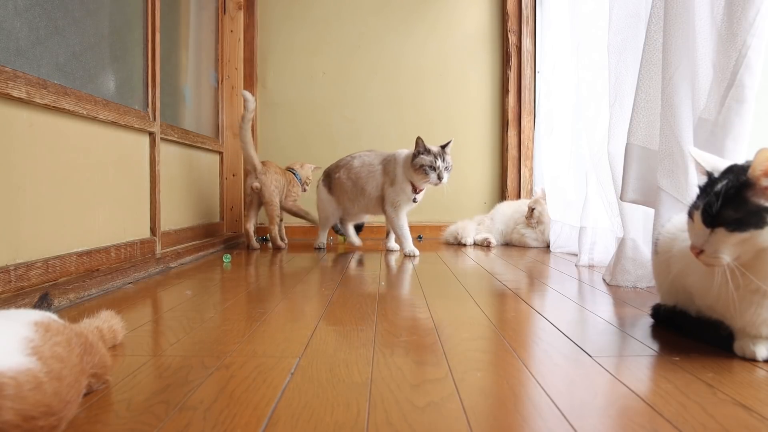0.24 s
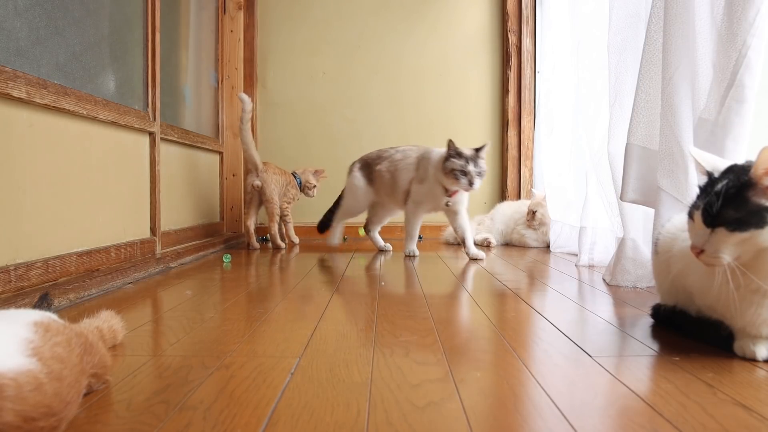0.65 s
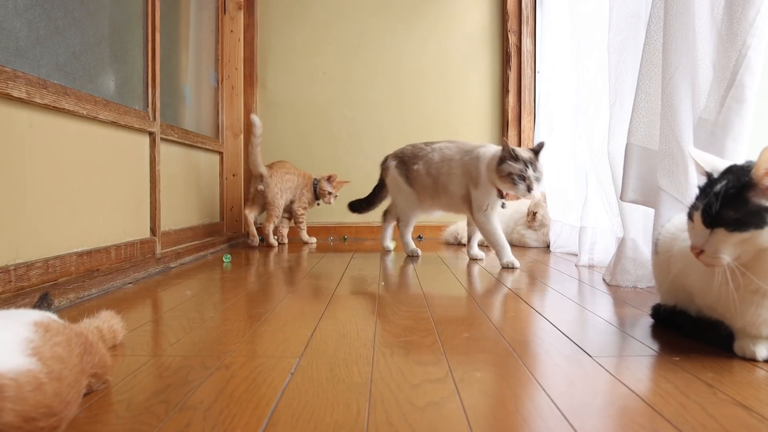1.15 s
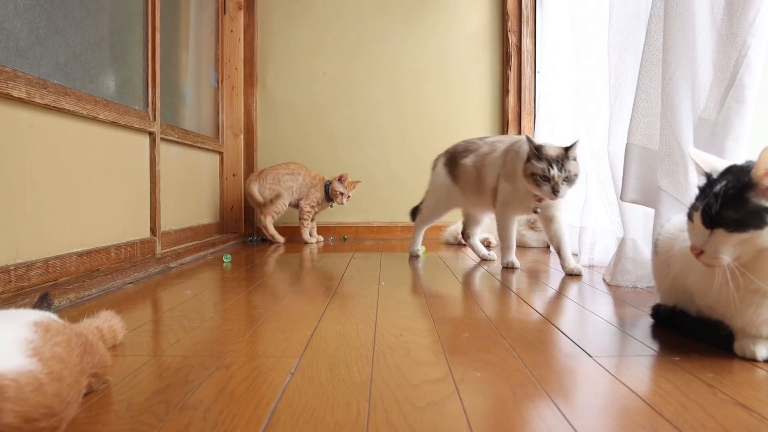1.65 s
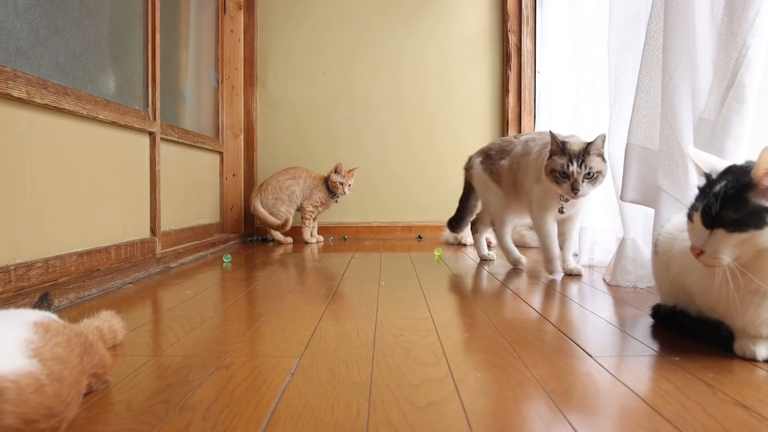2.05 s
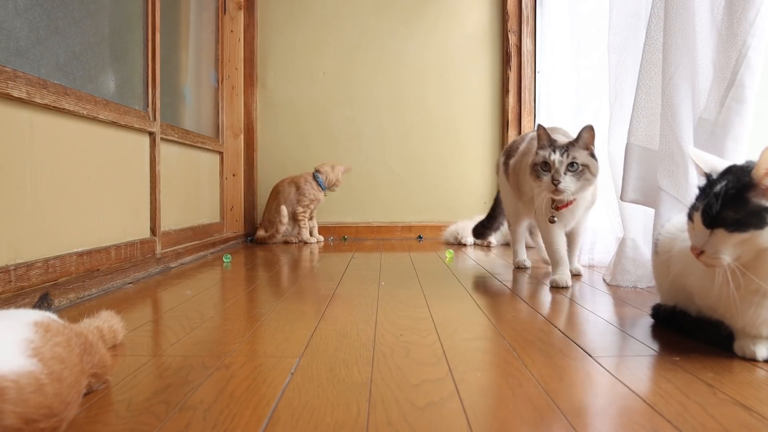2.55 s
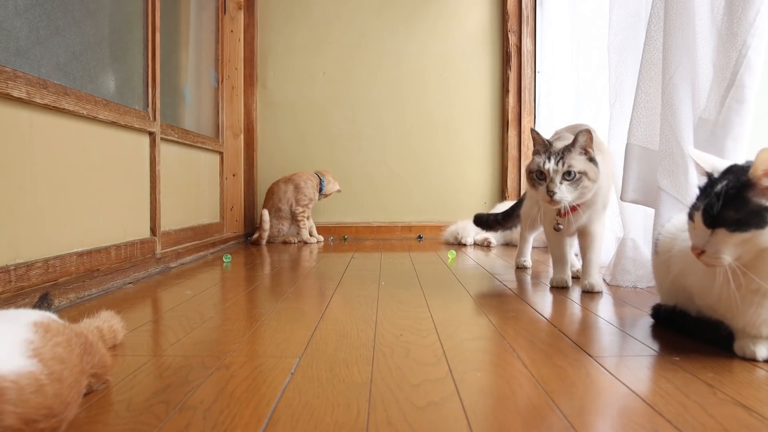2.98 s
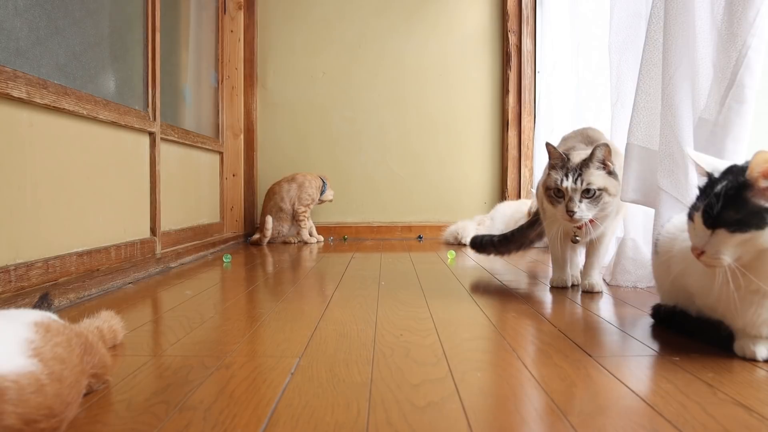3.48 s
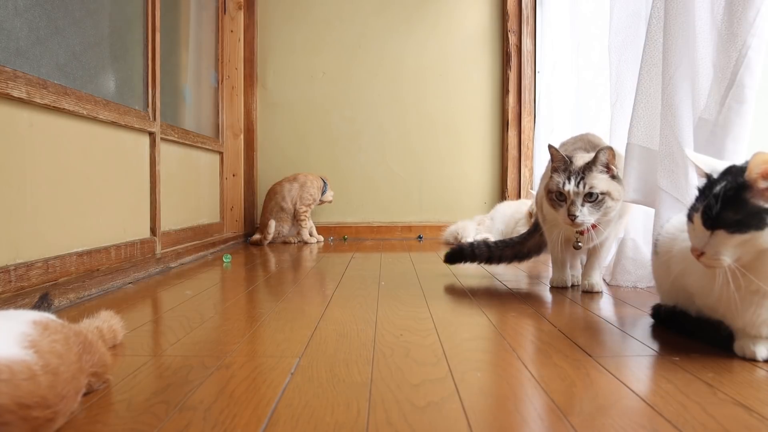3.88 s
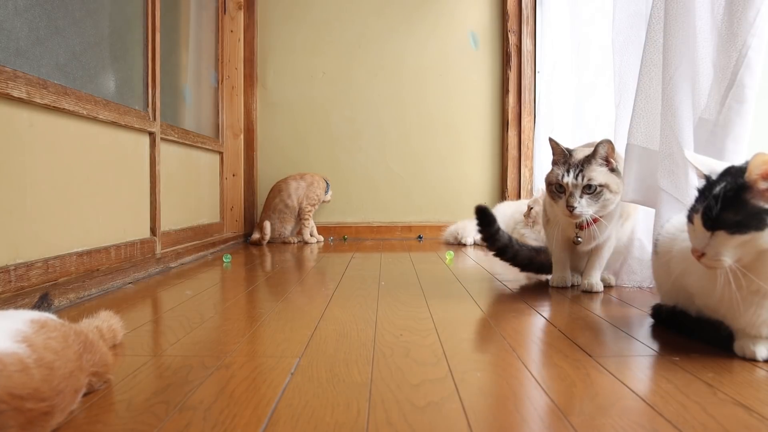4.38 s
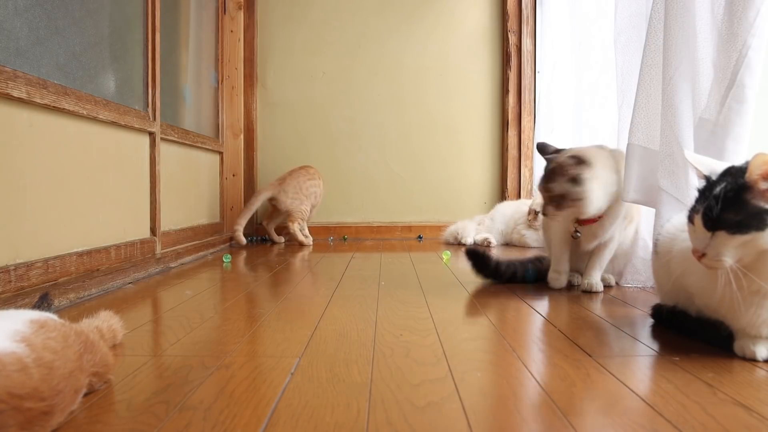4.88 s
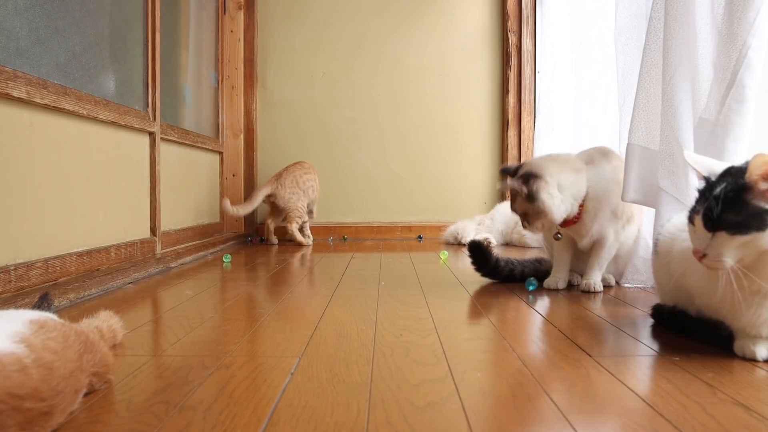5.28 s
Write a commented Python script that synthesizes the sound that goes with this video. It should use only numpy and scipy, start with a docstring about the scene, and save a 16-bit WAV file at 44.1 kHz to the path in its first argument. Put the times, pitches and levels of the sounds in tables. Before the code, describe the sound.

Indoors, close stereo microphones hear rubber balls thudding and slapping on wooden boards over a soft low air rush. Opening knocks lead to a run that quickens and fades. After a near pause, a loud close smack lands, then a hard double hit with panel rattle and deep shudder, and finally another shortening series of bounces on the right-hand part of the floor.

```python
"""A hard thud opens the scene over a steady rush of air; more rubber-ball bounces strike a wooden-floored room.
Each contact pulse excites the damped modes of the boards, most add a dispersed bending wave, and
filtered noise gives the slap; one run of bounces is computed from a fixed loss of speed, so it quickens and fades.
A loose door panel buzzes; faint whistles, tinks and a deep shudder follow at set times.
Echoes and a diffuse ring form the room; a close microphone pair with gain control hears it all."""
import sys
import numpy as np
from scipy import signal
from scipy.fft import rfft, irfft, next_fast_len
from scipy.io import wavfile
from scipy.ndimage import uniform_filter1d

SR = 44100
rng = np.random.default_rng(int(sys.argv[2]) if len(sys.argv) > 2 else 0)


def int16_out(signal):
    """Quantize to a 16-bit WAV file."""
    q = np.round(np.clip(np.atleast_2d(signal).T, -1, 1) * 32767)
    wavfile.write(sys.argv[1], SR, q.astype(np.int16))


N = 243873

# Bounces timed one by one, among them the settling ball's earlier ones.
# Each row: start in seconds, landing spot, blow in dB, contact in ms, slap in dB.
BOUNCES = [ (0.001, "edge", -8, 2.84, -6.5), (0.1045, "wall", -5, 1.74, 3.5),
           (0.3847, "edge", 1.5, 1.95, -2), (0.6238, "far", 0, 1.8, -1.5), (0.8212, "far", -1.5, 2.18, -7),
           (0.989, "far", -2, 2.21, -6), (1.1362, "far", -3, 2.2, -5.5), (1.812, "far", -18, 3.6, -30),
           (1.936, "far", -21, 4.6, -35), (2.8869, "close", 9.5, 1.63, 15.5), (3.9705, "edge", 8, 1.16, 14),
           (4.0455, "frame", 11, 1.44, 8.5), (4.098, "frame", 2, 2.45, -12.5),
           (4.7280, "right", 6.5, 1.66, 0), (4.9475, "wall", -21.5, 1.4, -3),
           (5.0149, "right", -1, 2.08, -6.5), (5.1472, "right", -2.5, 2.12, -7),
           (5.288, "right", -8.5, 2.45, -27), (5.3657, "right", -7, 2.25, -16),
           (5.432, "right", -8, 2.6, -12), (5.481, "right", -14.5, 3, -25)]
# The later, quickening bounces of a settling ball. Each row: first computed bounce in seconds,
# its following flight in seconds, landing spot, blow in dB, contact in ms, slap in dB;
# the last three hold for the first computed bounce.
SETTLING_RUNS = [(1.2606, 0.1062, "far", -4.5, 2.26, -9)]
REBOUND = 0.853   # share of its speed, and so of its flight time, kept at each bounce
REST_FLIGHT_S = 0.027   # hops this short make no further blow
# Powers: the blow follows flight time above the rest limit, slap and contact follow speed.
BLOW_LAW, SLAP_LAW, CONTACT_LAW = 0.72, 0.91, 0.18

# Landing spots. Each row: name, thud rise in seconds, cubic phase step of the modes in rad,
# slap rise in seconds, slap t60 in seconds, slap cut-off in Hz, clean snap's share of slap energy (0-1),
# level of the slap sent to the room in dB, level of the thud sent to the room in dB.
LANDING_SPOTS = [("wall", 0.00052, 0.00443, 0.04, 0.13, 2200, .01, -16, -4),
                 ("edge", 0.00031, .00772, 0.00097, 0.047, 3740, 0.37, -5, -5),
                 ("far", 0.0017, 0.003912, 0.002, 0.06, 3700, 0.17, -5, -10),
                 ("right", 0.0001, 0, .001, 0.06, 3900, 0.49, -4, -8.5),
                 ("close", 0.00024, .008, 0.0015, 0.0098, 18000, 0.93, -9, -6),
                 ("frame", 0.00065, .00796, 0.0032, 0.08, 1730, 0.15, -5.5, -8)]
# Modes of the floor; the last four, quickly damped, are the patch right under the ball.
# Each row: frequency in Hz, t60 in seconds, then level in dB at wall, edge, far, right, close, frame.
FLOOR_MODES = [(49.7, 1.0, -63, -65.0, -67, -36.5, -58.5, -42.5),
               (89.6, 0.43, -66, -66.5, -26.5, -25, -22.5, -31),
               (124, 0.084, -39, -38.5, -9, -19, -12, -25.5),
               (162.8, 0.06, -34, -20.5, -16, -31.5, -33, -26),
               (198.8, 0.2, -53, -37.5, -24.5, -20.5, -57, -25.5),
               (242, 0.041, -8.5, -28.5, -13.5, -27.5, -23.5, -27.5),
               (314.2, 0.061, -44.5, -14, -14, -21, -16, -19.5),
               (377, 0.084, -6.5, -29.5, -66.5, -19, -52, -19),
               (421, 0.037, -12.5, -14, -31.5, -15, -23, -22.5), (448, 0.073, -4, -12, -9, -44, -31.5, -29),
               (515, 0.12, -32, -14.5, -19.5, -24, -29, -17.5),
               (568, 0.098, -25, -28, -25.5, -20.5, -16.5, -21.5),
               (610.6, 0.095, -11.5, -14.5, -48.5, -15.5, -23.5, -17),
               (677.2, 0.14, -35, -19, -21.5, -22, -18, -22.5),
               (707, 0.07, -17, -12.5, -46.5, -21, -12.5, -18),
               (855, 0.065, -25.5, -17, -18, -32, -27.5, -20.5),
               (916, 0.041, -34, -18.5, -41.5, -17, -7.5, -13.5),
               (1003, 0.023, -2.5, -12.5, -28, -26, -14, -15.5),
               (364.7, 0.024, -16.5, -19, -8, -15.5, -60.5, -12.5),
               (811, 0.024, -8.5, -38.5, -30.5, -11.5, -7.5, -28),
               (169.6, 0.017, -15, -10.5, -45, -37, -4, -9), (496.6, 0.025, -6, 0, 0.5, -12, -7, -35)]
WANDER_SHARE = 0.017   # relative spread of each mode's pitch from bounce to bounce
WANDER_DB = 2.5   # spread of each mode's level: no two bounces hit quite the same place
# Bending waves along the boards. Each row: landing spot, peak in dB relative to the blow,
# centre in Hz, width in octaves, travel time at 100 Hz in seconds.
BENDING_WAVES = [("edge", -16.5, 210, 0.91, 0.01524), ("far", -20, 340, 0.63, .034),
                 ("right", -12.5, 262, 1, .033), ("close", -17.5, 164, 0.85, 0.032),
                 ("frame", -12, 150, 0.82, 0.00929)]
TRAVEL_LAW = 0.764   # travel time falls with this power of frequency
LOWEST_BOOM_HZ = 45.1   # the boards radiate little below this
# Colour of rubber slapping on varnish. Each row: frequency in Hz, gain in dB.
SLAP_COLOUR = [(150, -22.5), (700, 7), (1100, -1.5), (1450, 2), (2100, -6), (2900, -4), (4000, -9.5),
               (5500, -6), (8000, -26), (12000, -43.5), (16000, -41)]
GRAIN_DB = 4   # unevenness of slaps and buzzes

# Early reflections off walls and ceiling. Each row: landing spot, delay in ms, gain in dB.
ROOM_ECHOES = [("wall", 13.9, -4.5), ("edge", 8.5, -4.5), ("edge", 50, -15), ("far", 5.97, -7.5),
               ("far", 11.7, -12.5), ("far", 32, -17), ("right", 12.44, -9), ("right", 22, -13.5),
               ("close", 11.2, -13), ("close", 72, -17), ("close", 88, -17), ("frame", 16, -7.5)]
# Decay of the room. Each row: frequency in Hz, t60 in seconds.
ROOM_DECAY = [(80, 0.46), (200, 0.38), (400, 0.3), (1000, 0.32), (3000, 0.44), (8000, 0.2)]
ROOM_LEAK_HZ = 130   # lower sound escapes through the thin walls
# Left-right coherence of diffuse sound. Each row: frequency in Hz, likeness (0-1).
DIFFUSE_LIKENESS = [(110, .9995), (250, .92), (500, .62), (1000, .65), (2000, .6), (4000, .8), (10000, .75)]
# Shape of the air noise. Each row: frequency in Hz, relative density in dB per Hz.
AIR_COLOUR = [(22, -9), (48, -6), (65, -1), (90, -0.5), (120, -0.5), (165, -12.5), (300, -14.5),
              (420, -19.5), (800, -21.5), (2300, -23.5), (3200, -30.5), (4500, -31), (6500, -39),
              (12500, -63.5), (14500, -81)]
AIR_DB = -43   # rms

# Buzzes of a loose door panel. Each row: start in seconds, swell in seconds, level in dB,
# strongest frequency in Hz.
PANEL_BUZZES = [(0.104, 0.017, -36.5, 1550), (0.992, 0.0064, -34.5, 1700), (1.139, 0.0031, -42, 1700),
                (2.895, 0.01, -42, 1900), (2.934, 0.032, -41, 1820), (3.973, 0.008, -33.5, 1410),
                (4.046, 0.01, -26, 1105), (4.729, 0.014, -35.5, 1400), (4.951, 0.02, -33, 1500),
                (5.148, .004, -43, 1400)]
# Modes of the panel. Each row: frequency in Hz, t60 in seconds, relative level in dB.
PANEL_MODES = [(1050, .04, -1.5), (1280, 0.044, 3.5), (1455, 0.04, 5), (1640, 0.025, 1.5),
               (2030, 0.009, 2.5), (2170, 0.022, -3.5), (2920, 0.0086, -2)]
RATTLE_WIDTH_OCTAVES, RATTLE_ROOM_DB = 0.56, -9   # spread of the modes one buzz wakes; its ring

# Faint far whistles. Each row: start in seconds, length in seconds, first pitch in Hz, peak in dB.
FAR_WHISTLES = [(1.6, 0.41, 4880, -62), (1.7, 0.44, 4170, -63), (2.2, 0.14, 3570, -63)]
WHISTLE_SAG_HZ_PER_S, WHISTLE_WIDTH_HZ = 400, 17
# Faint high tinks. Each row: start in seconds, pitch in Hz, level in dB, t60 of the ring in seconds.
HIGH_TINKS = [(3.895, 10600, -67.5, 0.11), (4.988, 6900, -36.5, 0.0051), (5.224, 6560, -40, 0.006)]

# The right microphone is a little brighter. Each row: frequency in Hz, left minus right in dB.
MICROPHONE_TILT = [(250, -.1), (500, -.3), (1000, -1.8), (4000, -2.4), (10000, -1.4)]
RIGHT_LAG_MS, CUTOFF_HZ = 0.083, 14800


def from_db(db):
    """Logarithmic level: 20 dB is a factor of ten in amplitude."""
    return 10 ** (np.asarray(db) / 20)


def rms_one(x):
    """Power normalisation: the signal is scaled to rms 1."""
    return x / np.sqrt(np.mean(x ** 2) + 1e-20)


def at_hz(points, hz):
    """Interpolation of a spectral table on a log-frequency axis."""
    known_hz, values = np.transpose(points)
    return np.interp(np.log(np.maximum(hz, 1)), np.log(known_hz), values)


def add(out, s, sound):
    """Superposition: a sound is summed into the mix from s seconds on."""
    start = min(max(round(s * SR), 0), N)
    out[:, start:start + sound.shape[1]] += sound[:, :N - start]


def dying(t, t60):
    """Exponential decay: amplitude falls by 60 dB in t60."""
    return np.exp(-np.log(1000) * t / t60)


def colour(x, spectrum):
    """Minimum-phase filtering: folding the cepstrum makes a dB curve causal."""
    size = 2 * next_fast_len(x.shape[-1])
    gain = from_db(at_hz(spectrum, np.fft.rfftfreq(size, 1 / SR)))
    cepstrum = irfft(np.log(gain))
    cepstrum[1:size // 2] *= 2
    cepstrum[size // 2 + 1:] = 0
    response = np.exp(rfft(cepstrum))
    return irfft(rfft(x, size) * response)[..., :x.shape[-1]]


def diffuse_noise(size):
    """Spatial coherence: shared and opposed white noise are mixed by the likeness at each frequency."""
    mid, side = rfft(rng.standard_normal((2, size)))
    alike = np.clip(at_hz(DIFFUSE_LIKENESS, np.fft.rfftfreq(size, 1 / SR)), 0, .9995)
    shared = np.sqrt((1 + alike) / 2) * mid
    opposed = np.sqrt((1 - alike) / 2) * side * [[1], [-1]]
    return irfft(shared + opposed, size)


def grainy(size):
    """Chattering contact: noise is modulated in lumps about a millisecond long, then set to rms 1."""
    lumps = rms_one(uniform_filter1d(rng.standard_normal(size), size=44))
    return rms_one(diffuse_noise(size) * from_db(GRAIN_DB * np.clip(lumps, -2, 2)))


def room_response():
    """Reverberation: one second of diffuse noise builds up, then each band decays at its own rate."""
    t, noise = np.arange(SR) / SR, diffuse_noise(SR)
    hz = np.fft.rfftfreq(SR, 1 / SR)
    centres = np.geomspace(60, 15000, 9)
    tail = 0
    for centre, share in zip(centres, np.eye(len(centres))):   # overlapping bands that sum to one
        band = irfft(rfft(noise) * at_hz(np.c_[centres, share], hz), SR)
        tail = tail + band * dying(t, at_hz(ROOM_DECAY, centre))
    build_up = 1 - np.exp(-(t / 0.013) ** 2)
    # about unit gain in the middle range
    return tail * build_up / np.linalg.norm(build_up * dying(t, 0.29))


def air():
    """Stationary noise: the steady rumble and hiss of the house are shaped diffuse noise."""
    return from_db(AIR_DB) * rms_one(colour(diffuse_noise(N), AIR_COLOUR))


def bending_wave(level_db, centre_hz, width_octaves, travel_s):
    """Dispersion: the highs of a pulse in the boards arrive first, so it falls in pitch."""
    hz = np.maximum(np.fft.rfftfreq(SR, 1 / SR), 1)
    delay_s = travel_s * (100 / np.maximum(hz, LOWEST_BOOM_HZ)) ** TRAVEL_LAW
    strength = np.exp(-(np.log2(hz / centre_hz) / width_octaves) ** 2 / 2)
    phase = -2 * np.pi * np.cumsum(delay_s)   # phase is group delay summed over 1 Hz steps
    wave = irfft(strength * np.exp(1j * phase), SR)[:SR // 2]
    return from_db(level_db) * np.pad(wave, (0, SR - len(wave))) / np.abs(wave).max()


def thud(spot, contact_ms, rise_s, dispersion):
    """Modal excitation by a contact pulse: the longer the push, the fewer high modes it wakes."""
    t, rank = np.arange(SR) / SR, np.arange(len(FLOOR_MODES))[:, None]
    hz, t60, *at_spots = np.transpose(FLOOR_MODES)[:, :, None]
    strength = from_db(at_spots[spot] + WANDER_DB * rng.standard_normal(hz.shape))
    hz = hz * (1 + WANDER_SHARE * rng.standard_normal(hz.shape))
    # signs alternate from mode to mode; the cubic term scatters the phases of later rows
    lead = np.pi * rank + dispersion * rank ** 3
    modes = strength * np.sin(2 * np.pi * hz * t + lead) * dying(t, t60)
    boards = np.sum(modes, axis=0) * (1 - np.exp(-t / rise_s))
    for where, *wave in BENDING_WAVES:
        if where == LANDING_SPOTS[spot][0]:
            boards = boards + bending_wave(*wave)
    progress = np.arange(0, 1, 1000 / (contact_ms * SR))
    push = np.sin(np.pi * progress) ** 1.5   # the ball squashes and springs back
    boom = signal.butter(2, LOWEST_BOOM_HZ, "high", fs=SR, output="sos")
    radiated = signal.sosfilt(boom, boards)
    return signal.fftconvolve(radiated, push / push.sum())[:SR]


def slap(rise_s, t60, dull_hz, snap_share):
    """Broadband impact: rubber on varnish gives a click and a decaying noise burst, dulled by a low-pass."""
    t, share = np.arange(SR) / SR, np.clip(snap_share, 0, 1)
    envelope = (1 - np.exp(-t / rise_s)) * dying(t, t60)
    burst = grainy(SR) * envelope / np.linalg.norm(envelope)
    contact = colour(np.sqrt(share) * (t == 0) + np.sqrt(1 - share) * burst, SLAP_COLOUR)
    dull = signal.butter(2, min(dull_hz, .45 * SR), fs=SR, output="sos")
    return signal.sosfilt(dull, contact)


def settle(s, flight_s, name, blow_db, contact_ms, slap_db):
    """Constant restitution: equal relative loss of speed makes bounces quicken, soften and fade."""
    speeds = REBOUND ** np.arange(30)   # relative to the first computed bounce
    flights = flight_s * speeds
    times = s + np.cumsum(flights) - flights
    lifts = (flights - REST_FLIGHT_S) / (flight_s - REST_FLIGHT_S)
    bounces = []
    for time, speed, lift in zip(times, speeds, lifts):
        if lift > 0 and time < N / SR:
            blow = blow_db + BLOW_LAW * 20 * np.log10(lift)
            slap_level = slap_db + SLAP_LAW * 20 * np.log10(speed)
            bounces.append((time, name, blow, contact_ms / speed ** CONTACT_LAW, slap_level))
    return bounces


def landings():
    """Sequence of impacts: the bounces timed one by one are joined by the computed ones."""
    return BOUNCES + [bounce for run in SETTLING_RUNS for bounce in settle(*run)]


def balls():
    """Direct, reflected and reverberant sound: each spot has its own echoes and its own room ring."""
    out, names = np.zeros((2, N)), [row[0] for row in LANDING_SPOTS]
    rooms = [room_response() for _ in LANDING_SPOTS]
    wall = signal.butter(2, 900, fs=SR, output="sos")   # reflection loses treble
    leak = signal.butter(1, ROOM_LEAK_HZ, "high", fs=SR, output="sos")
    for s, name, blow_db, contact_ms, slap_db in landings():
        spot = names.index(name)
        (thud_rise_s, dispersion, rise_s, slap_t60, dull_hz, snap_share,
         slap_room_db, thud_room_db) = LANDING_SPOTS[spot][1:]
        low = from_db(blow_db) * thud(spot, contact_ms, thud_rise_s, dispersion)
        high = from_db(slap_db) * slap(rise_s, slap_t60, dull_hz, snap_share)
        direct = low + high
        add(out, s, direct)
        # the ring is fed by a slap with its own, mostly clean, snap
        snap = from_db(slap_db) * slap(rise_s, slap_t60, dull_hz, snap_share=0.94)[0]
        to_room = from_db(thud_room_db) * low + from_db(slap_room_db) * snap
        add(out, s, signal.fftconvolve(signal.sosfilt(leak, to_room + 1e-18)[None], rooms[spot]))
        dulled = signal.sosfilt(wall, direct + 1e-18)
        for where, delay_ms, echo_db in ROOM_ECHOES:
            if where == name:
                add(out, s + delay_ms / 1000, from_db(echo_db) * dulled)
    return out


def rattles():
    """Resonance under chatter: a short swell of grainy noise drives panel modes, which ring in the room."""
    out, t = np.zeros((2, N)), np.arange(SR // 4) / SR
    hz, t60, level_db = np.transpose(PANEL_MODES)[:, :, None]
    modes = from_db(level_db) * np.sin(2 * np.pi * hz * t) * dying(t, t60)
    for s, swell_s, rattle_db, centre_hz in PANEL_BUZZES:
        woken = np.exp(-(np.log2(hz / centre_hz) / RATTLE_WIDTH_OCTAVES) ** 2 / 2)
        panel = np.sum(modes * woken, axis=0)
        chatter = grainy(len(t)) * t / swell_s * np.exp(-(t / swell_s) ** 2 / 2)
        buzz = signal.fftconvolve(chatter, panel[None] / np.linalg.norm(panel))
        add(out, s, from_db(rattle_db) * buzz)
    ring = signal.fftconvolve(out.mean(axis=0)[None], room_response())[:, :N]
    return out + from_db(RATTLE_ROOM_DB) * ring


def whistles():
    """Phase diffusion: thin tones, perhaps birds outside, swell, sag and waver by a random walk of phase."""
    out = np.zeros((2, N))
    for s, length_s, hz, level_db in FAR_WHISTLES:
        t = np.arange(0, length_s, 1 / SR)
        waver = np.cumsum(rng.standard_normal(len(t))) * np.sqrt(2 * np.pi * WHISTLE_WIDTH_HZ / SR)
        turns = np.cumsum(hz - WHISTLE_SAG_HZ_PER_S * t) / SR
        tone = np.sin(2 * np.pi * turns + waver)
        add(out, s, from_db(level_db) * (tone * np.sin(np.pi * t / length_s))[None])
    return out


def tinks():
    """Noise-driven resonance: decaying noise excites tiny metallic rings, perhaps from a cat's collar."""
    out, t = np.zeros((2, N)), np.arange(SR // 2) / SR
    for s, hz, level_db, t60 in HIGH_TINKS:
        rattle = rng.standard_normal(len(t)) * dying(t, 0.11)
        resonance = np.sin(2 * np.pi * hz * t) * dying(t, t60)
        ring = signal.fftconvolve(rattle / np.linalg.norm(rattle), resonance)
        add(out, s, from_db(level_db) * np.array([ring, ring]))
    return out


def rumble(start_s=4.06, level_db=-27, t60=0.71, top_hz=55):
    """Band-limited noise: a deep shudder swells and fades after the hard blow on the frame."""
    t = np.arange(SR) / SR
    band = signal.butter(2, [22, top_hz], "band", fs=SR, output="sos")
    deep = signal.sosfilt(band, rng.standard_normal(2 * SR))[None, SR:]   # skip the filter's start
    out = np.zeros((2, N))
    # level is the rms ahead of the swell and decay
    add(out, start_s, from_db(level_db) * rms_one(deep) * dying(t, t60) * (1 - dying(t, 0.24)))
    return out


def scene():
    """Superposition and delay: the sources sum, and the right microphone hears them a moment later."""
    left, right = air() + balls() + rattles() + whistles() + tinks() + rumble()
    khz = np.fft.rfftfreq(N, 1000 / SR)
    delay = np.exp(-2j * np.pi * khz * RIGHT_LAG_MS)
    return np.array([left, irfft(rfft(right) * delay, N)])


def gain_control(x, threshold_db=-21, release_db_per_s=6.0, window_s=0.24):
    """Level compression: smoothed power above the threshold cuts the gain, which creeps back slowly."""
    r = np.exp(-1 / (window_s * SR))
    power = signal.lfilter([1 - r], [1, -r], np.mean(x ** 2, axis=0))
    level_db = 10 * np.log10(power + 1e-12)
    ramp = release_db_per_s * np.arange(N) / SR
    # the running maximum on a rising ramp lets each cut fall at the release rate
    cut_db = np.maximum.accumulate(np.maximum(level_db - threshold_db, 0) + ramp) - ramp
    return x * from_db(-cut_db)


def record(dry):
    """Transduction: microphone tilt, gain control, clipping at full scale and a steep top cut act in turn."""
    heard = []
    for x, side in zip(dry, (1, -1)):   # each channel takes half the tilt
        heard.append(colour(x, [(hz, side * db / 2) for hz, db in MICROPHONE_TILT]))
    clipped = np.clip(gain_control(np.array(heard)), -1, 1)
    top_cut = signal.ellip(10, .1, 80, CUTOFF_HZ, fs=SR, output="sos")
    return signal.sosfilt(top_cut, clipped)


dry = scene()
out = record(dry)
int16_out(out)
```